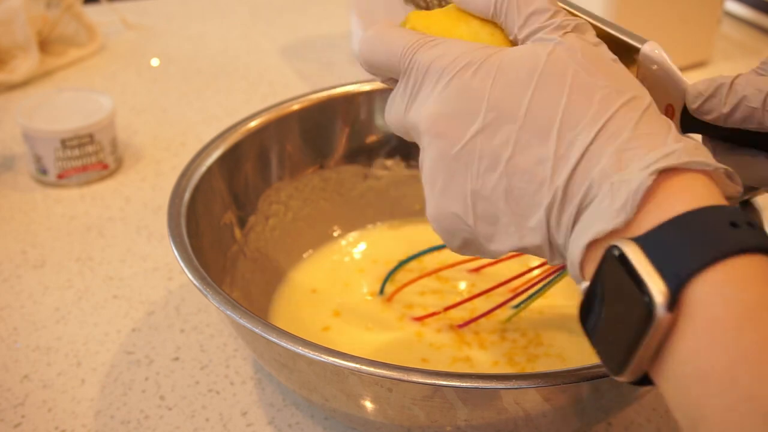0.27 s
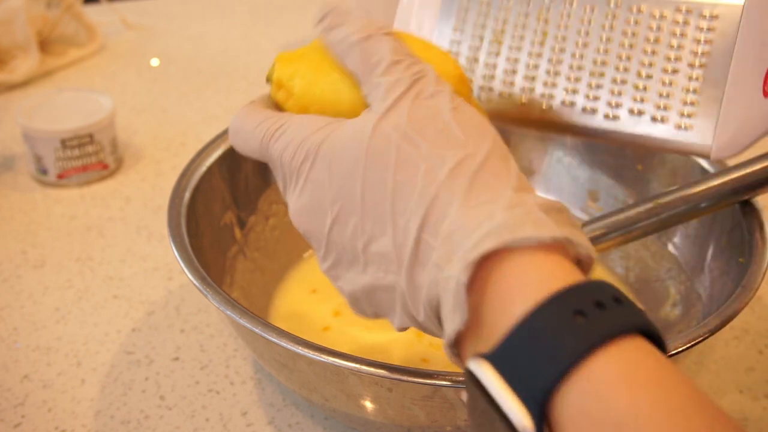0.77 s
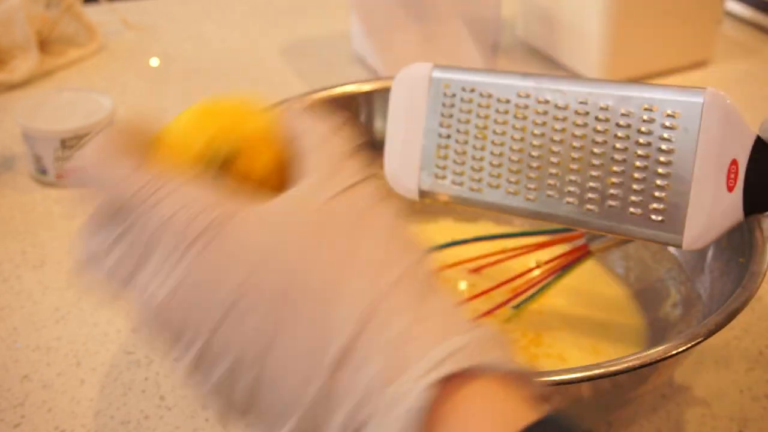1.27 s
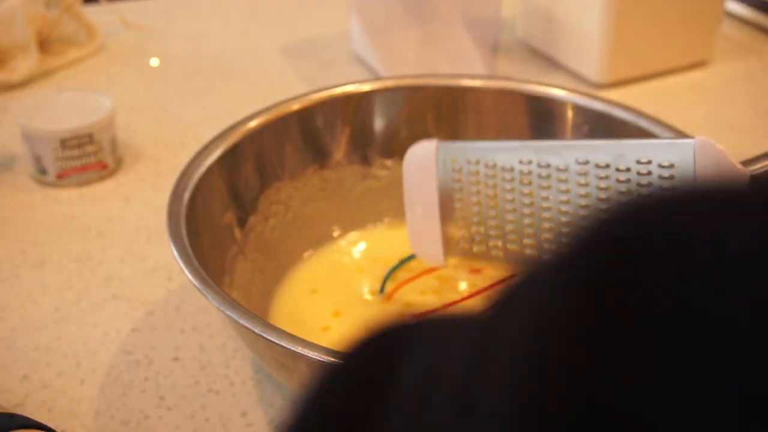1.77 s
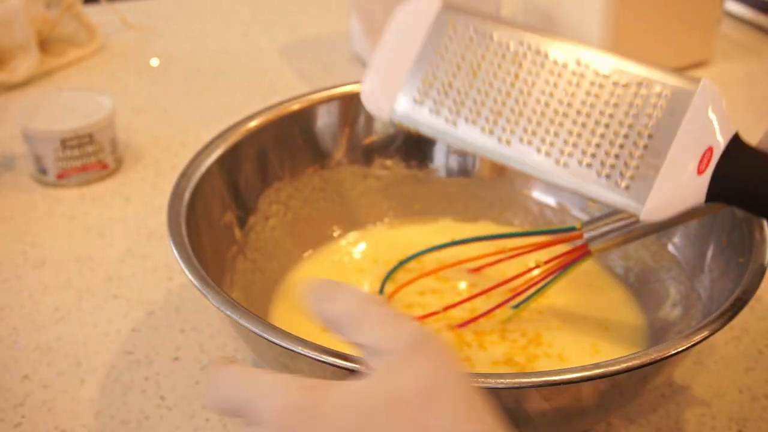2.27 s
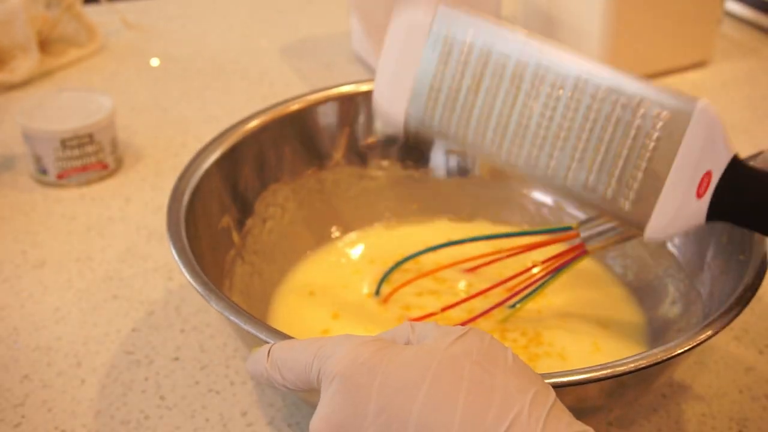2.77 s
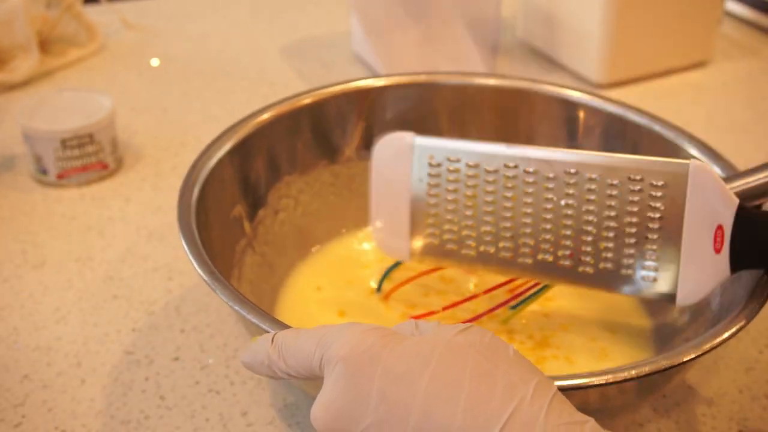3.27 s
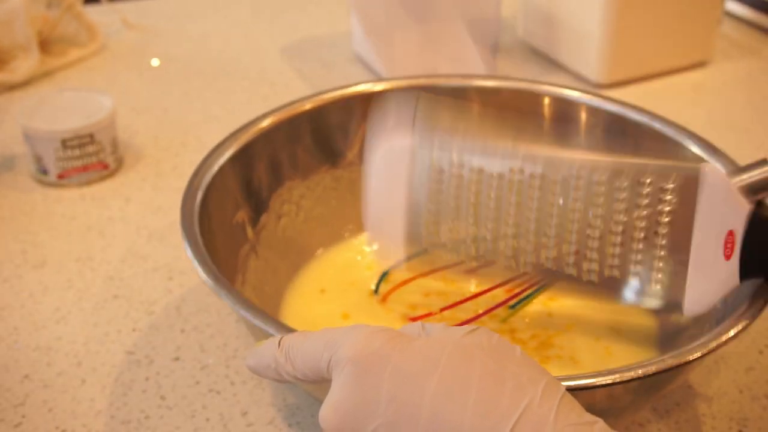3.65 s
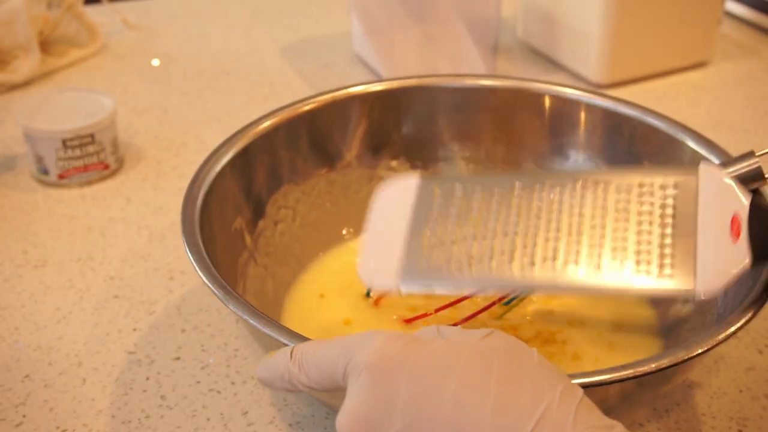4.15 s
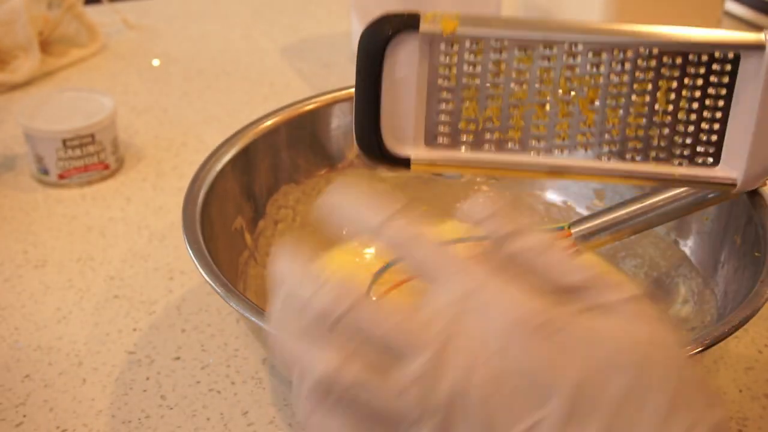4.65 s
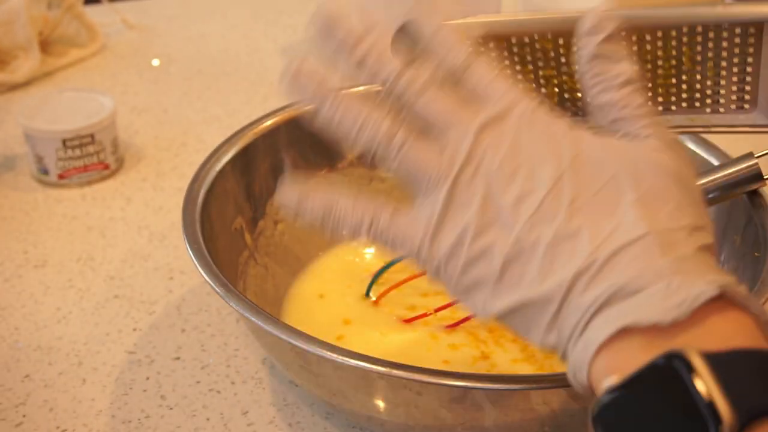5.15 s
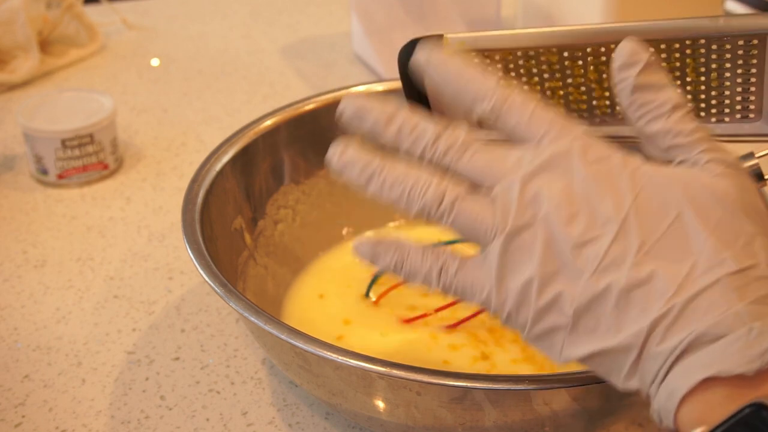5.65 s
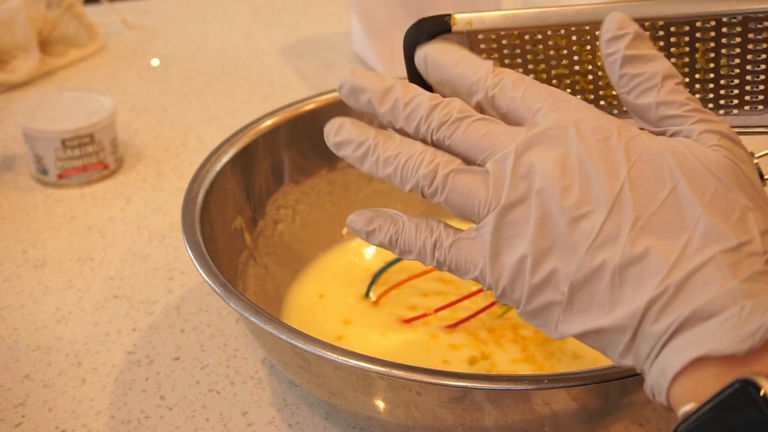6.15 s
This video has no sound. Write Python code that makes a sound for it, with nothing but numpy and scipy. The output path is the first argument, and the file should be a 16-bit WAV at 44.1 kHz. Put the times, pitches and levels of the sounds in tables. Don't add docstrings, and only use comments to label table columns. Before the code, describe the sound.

A hard, live kitchen, heard close in stereo, with steady low appliance hum, light hiss and barely audible high squeaks. From 0 to 0.5 s, four quick wet rasps tear lemon peel on a steel grater, broad and hissy, the plate singing at shifting pitches. From 0.6 to 2.4 s it is quiet: thin gloves crinkle, tiny ticks sound, and the bowl is nudged softly near 1.9. A lighter knock lands at 2.5, a firmer one at 2.7, then six hard blows about 0.2 s apart from 3.1 to 4.1. Each is a dull, hollow thud with bright whisk clanks and rebounds on the rim, rattling chatter and a low wobble as the base rocks. The ring dies away in the room. From 4.6, glove rustle and fine ticks return, with short dry finger brushes over the teeth around 5.2, 5.5, 5.9 and 6.4.

```python
import sys
import numpy as np
from scipy import signal
from scipy.fft import rfft, irfft
from scipy.io import wavfile

SR = 44100
rng = np.random.default_rng(int(sys.argv[2]) if len(sys.argv) > 2 else 0)


def store_pcm(level_fs):
    pcm = np.round(np.clip(level_fs, -1, 1) * 32767).astype(np.int16)
    wavfile.write(sys.argv[1], SR, np.atleast_2d(pcm).T)


def volts(x):
    e = np.asarray(x, float) / 20
    return 10 ** e


N = 283122

# (t/s, peak level/dB, pulse f/Hz, metal tick re peak/dB, whisk chatter/dB)
KNOCKS = [
    (2.529, -17, 487, -10, -41.5),
    (2.672, -14, 525, -14, -33.5),
    (3.087, -9.5, 570, -9.5, -37.5),
    (3.295, -8, 607, -7, -26.5),
    (3.502, -7, 540, -8, -35),
    (3.698, -7, 543, -9, -41.5),
    (3.889, -6.5, 595, -10.5, -39.5),
    (4.106, -6.5, 693, -12.5, -35.5),
]


def rms_one(x):
    return x / np.sqrt(np.mean(x ** 2) + 1e-20)


def at_hz(points, hz):
    table_hz, values = np.transpose(points)
    return np.interp(np.log(hz), np.log(table_hz), values)


def band(x, low_hz, high_hz):
    edges_hz = [low_hz, min(high_hz, 0.45 * SR)]
    return signal.sosfilt(signal.butter(2, edges_hz, "band", fs=SR, output="sos"), x + 1e-18)


def shaped(x, spectrum):
    hz = np.maximum(np.arange(N // 2 + 1) * SR / N, 1)
    return irfft(rfft(x) * volts(at_hz(spectrum, hz)), N)


def ring(clicks, hz, t60_s):
    r = volts(-60 / (t60_s * SR))
    w = 2 * np.pi * hz / SR
    return signal.lfilter([0, np.sin(w)], [1, -2 * r * np.cos(w), r * r], clicks + 1e-18)


def resonant(x, peaks):
    total = 0
    for hz, width_hz, db in peaks:
        t60_s = np.log(1000) / (np.pi * width_hz)
        total = total + volts(db) * rms_one(ring(x, hz, t60_s))
    return rms_one(total)


def grains(per_s, spread_db):
    sizes = volts(spread_db * np.minimum(rng.exponential(1, N), 4)) * rng.choice([-1, 1], N)
    return rms_one(sizes * (rng.random(N) < per_s / SR))


def dying(hits, t60_s):
    power = signal.lfilter([1], [1, -volts(-120 / (t60_s * SR))], hits ** 2 + 1e-18)
    return np.sqrt(power) * rng.standard_normal((2, N))


def swell(start_s, hold_s, db, rise_db_s, fall_db_s):
    t = np.arange(0, N + 32, 32) / SR
    climb_db = rise_db_s * np.maximum(start_s - t, 0)
    sink_db = fall_db_s * np.maximum(t - start_s - hold_s, 0)
    return np.interp(np.arange(N) / SR, t, volts(db - climb_db - sink_db))


def wide(pair):
    # (f/Hz, correlation)
    likeness = [(100, 0.94), (200, 0.88), (400, 0.68), (800, 0.12), (2000, 0.079), (5000, 0.057),
                (12000, 0.081)]
    size = pair.shape[1]
    hz = np.maximum(np.arange(size // 2 + 1) * SR / size, 1)
    alike = np.clip(at_hz(likeness, hz), 0, 1)
    mid, side = rfft(pair) * np.sqrt([1 + alike, 1 - alike])
    return irfft(np.array([mid + side, mid - side]), size) / np.sqrt(2)


def background():
    # (f/Hz, density/dB)
    hum_spectrum = [(15, -57), (25, -6.5), (70, -13), (114, -8.5), (200, -7), (223, -12), (309, -7.5),
                    (416, -12.5), (503, -15), (1650, -26), (1940, -27.5), (5430, -29), (16000, -33)]
    # (t/s, length/s, level/dB)
    squeaks = [
        (1.22, .09, -72),
        (1.82, .08, -72),
        (5.22, .04, -66),
        (5.75, .055, -73),
        (5.818, 0.032, -69),
        (6.25, 0.073, -68.5),
    ]
    hum = wide(shaped(rng.standard_normal((2, N)), hum_spectrum))
    t = np.arange(N) / SR
    whistle = rms_one(ring(rng.standard_normal(N), 11400, 0.06))
    gain = 0
    for start_s, length_s, db in squeaks:
        corners_s = [start_s, start_s + 0.015, start_s + length_s, start_s + length_s + 0.02]
        gain = gain + volts(db) * np.interp(t, corners_s, [0, 1, 1, 0])
    return volts(-53.5) * rms_one(hum) + gain * whistle


def rasp():
    # (full pressure t/s, hold/s, level/dB, plate tone re rasp/dB, singing spot f/Hz)
    rasp_strokes = [
        (-0.01, 0.02, -33, -9, 2180),
        (0.109, 0.045, -34, -5, 2800),
        (0.268, 0.024, -32.5, -6, 2140),
        (0.396, 0.08, -34, -6, 3460),
    ]
    # (f/Hz, density/dB)
    hiss_spectrum = [(350, -28), (600, -28), (1030, -13), (1490, -20), (2040, -8.5), (2800, -6.5),
                     (3040, -6), (4780, -10), (9360, -11), (11800, -7.5), (16000, -13)]
    # (f/Hz, width/Hz, level/dB)
    plate_modes = [(2330, 90, -4), (2450, 97, -5), (2700, 180, 8.5), (3450, 150, -3), (3500, 120, 3),
                   (4240, 140, 0), (6430, 200, -16)]
    teeth_modes = [(10500, 300, 5), (11500, 250, -7), (12700, 400, -3)]
    tearing = np.array([grains(per_s=9000, spread_db=2.5), 0.62 * grains(per_s=11000, spread_db=-1.5)])
    hiss = volts(3.0) * rms_one(wide(shaped(tearing, hiss_spectrum)))
    catching = grains(per_s=2500, spread_db=3.0)
    plate = volts(-3.5) * resonant(catching, plate_modes)
    teeth = volts(-15.0) * resonant(catching, teeth_modes)
    out = np.zeros((2, N))
    for start_s, hold_s, db, plate_db, spot_hz in rasp_strokes:
        spot = volts(-11.5) * resonant(catching, [(spot_hz, 120, 0)])
        pressure = swell(start_s, hold_s, db, rise_db_s=294, fall_db_s=484)
        out += pressure * (hiss + teeth + volts(plate_db) * plate + spot)
    return out


def gloves():
    # (t/s, hold/s, rustle level/dB, brightness/dB, hollow tone/dB)
    moves = [(0.56, 0.14, -63.5, -1, 10), (0.83, 0.013, -62.5, 0, -12), (0.94, .025, -64.5, 1, -5),
             (1.24, 0.073, -71, -4, -4), (1.37, 0.041, -60, -1, -6), (1.5, 0.25, -60.5, -5, 1.5),
             (2.0, 0.22, -61, 2.5, -7), (2.285, 0.014, -57, 4, -18), (2.441, 0.15, -54.5, -10, -8),
             (4.6, 0.07, -51.5, -2, -36), (4.74, .1, -60, 0, -5), (4.89, 0.1, -68, 3, -5),
             (5.14, .065, -69.5, 10, -20), (5.5, .02, -71, -3, -12), (5.885, .03, -67, 4, -20),
             (5.97, 0.046, -66, -6, -18), (6.2, 0.091, -77, 9, -10), (6.38, .04, -73, 6, -6)]
    # (t/s, length/s, level/dB, brightness/dB)
    brushes = [
        (1.359, 0.088, -59.5, 3),
        (5.111, 0.12, -70.5, 20),
        (5.186, .03, -54.5, 0),
        (5.491, 0.024, -51, -2.5),
        (5.873, 0.04, -49, 5),
        (6.364, 0.029, -56.5, -5),
    ]
    # (t/s, peak level/dB, f/Hz, fade/s)
    small_ticks = [(0.8205, -44, 9680, 0.0015), (0.9632, -44, 4340, 0.0015), (1.3894, -50, 2700, 0.0014),
                   (1.505, -55, 2230, 0.0015), (1.6305, -63, 2170, 0.0015), (1.767, -40.5, 5100, 0.0017),
                   (1.8907, -44, 8890, 0.0015), (2.0467, -42, 10500, 0.0015),
                   (2.0944, -46.5, 10300, 0.0015), (4.572, -36, 8600, 0.0015), (4.598, -42, 8360, 0.0019),
                   (4.6344, -41, 8100, 0.0015), (4.6775, -37, 5160, 0.0015), (4.7144, -45, 2420, 0.0016),
                   (4.8185, -35, 10700, 0.0017), (4.897, -40, 9500, 0.0013), (4.92, -44, 4360, 0.0013),
                   (5.004, -45, 4440, 0.0011), (5.21, -41, 4220, 0.0021), (5.417, -47, 4140, 0.0016),
                   (5.4955, -49, 4220, 0.0015), (5.6986, -41.5, 4000, 0.0014), (5.882, -35, 4160, 0.0026),
                   (5.9082, -32, 4690, 0.0024), (6.3657, -40.5, 4170, 0.0018)]
    t = np.arange(N) / SR
    crinkle = np.array([grains(per_s=2500, spread_db=1.0), grains(per_s=2300, spread_db=10.0)])
    dull = rms_one(band(crinkle, 2300, 8000))
    bright = rms_one(band(crinkle, 6500, 14000))
    hollow = rms_one(band(crinkle[:, ::-1], 2100, 2500))
    flutter = volts(2.0 * rms_one(band(rng.standard_normal(N), 12.4, 41)))
    gains = np.array([swell(start_s, hold_s, db, rise_db_s=200, fall_db_s=182)
                      for start_s, hold_s, db, _, _ in moves]) * flutter
    bright_db, hollow_db = np.transpose(moves)[-2:]
    out = gains.sum(0) * dull
    out += volts(bright_db) @ gains * bright
    out += volts(hollow_db - 5.5) @ gains * hollow

    frame = dull + volts(-23.0) * rms_one(band(crinkle, 4060, 4600))
    for start_s, length_s, db, brush_bright_db in brushes:
        end_s = start_s + length_s
        sweep = np.interp(t, [start_s, start_s + 0.0026, end_s, end_s + 0.022], [0.054, 1, 0.63, 0])
        out += sweep * volts(db) * (frame + volts(brush_bright_db) * bright)

    taps = np.zeros(N)
    for start_s, db, hz, fade_s in small_ticks:
        burst = rng.standard_normal(1500) * np.exp(-np.arange(1500) / (max(fade_s, 0.0003) * SR))
        click = band(burst, hz / 1.23, hz * 1.29) + volts(8.0) * band(burst, hz / 0.98, hz * 1.03)
        at = round(start_s * SR)
        taps[at:at + 1500] += volts(db) * click / np.abs(click).max()
    return wide(out), taps


def rocking():
    # (t/s, hold/s, level/dB, f/Hz, sway period/s)
    rocks = [
        (1.908, 0.061, -45, 94, 0.058),
        (2.515, .06, -46, 76, 0.07),
        (2.68, 0.12, -41.5, 73.8, .08),
        (3.092, 0.12, -35.5, 68.6, .077),
        (3.305, 0.071, -31, 69.3, 0.073),
        (3.51, 0.1, -32.5, 71, 0.073),
        (3.71, 0.078, -31, 69.7, 0.061),
        (3.91, 0.084, -29.5, 71, .085),
        (4.125, 0.066, -31, 70, 0.092),
    ]
    wobble = rms_one(band(rng.standard_normal(N), 12.0, 16.3))
    rumble = rms_one(band(rng.standard_normal(N), 85, 165))
    out = np.zeros(N)
    for k, (start_s, hold_s, db, hz, sway_s) in enumerate(rocks):
        since_s = np.clip(np.arange(N) / SR - start_s, -0.1, 0.6)
        fall_db_s = 130 if k else 900
        level = swell(start_s, hold_s, db, 1497, fall_db_s)
        level = level * (1 + 0.4 * np.cos(2 * np.pi * since_s / sway_s))
        pitch_hz = (hz - 25.12 * since_s) * (1 + 0.066 * wobble)
        tone = np.sin(2 * np.pi * np.cumsum(pitch_hz) / SR)
        out += level * (1.54 * tone + 0.48 * rumble)
    return out


def steel(ticks):
    # (t/s, peak level/dB, share below 2.6 kHz/dB, share above 5 kHz/dB)
    clanks = [(2.4417, -47, -20, -22.5), (2.481, -35, -19.5, -25.5), (2.5405, -9.5, -7.5, -26),
              (2.6847, -9.5, -6, -24.5), (2.8834, -34.5, -6.5, -28), (3.1114, -5.5, -11.5, -28),
              (3.1699, -13, -4, -21), (3.3184, -6, -11.5, -27), (3.3848, -7.5, -10.5, -26),
              (3.3972, -32, -13, -24), (3.5191, -8, -8.5, -24), (3.5892, -8.5, -11, -26),
              (3.717, -6.5, -10, -26.5), (3.7858, -12, -7, -22), (3.9102, -8, -7.5, -26),
              (3.9853, -19.5, -5.5, -19.5), (4.1205, -12, -6.5, -24), (4.1934, -23, -5, -19)]
    # (f/Hz, level/dB, t60/s)
    steel_modes = [(962.6, -23, 0.2), (1124, -33, 0.25), (1383, -18.5, 0.164), (1540, -4.5, 0.053),
                   (1760, -24, 0.1), (1955, -20, 0.11), (2003, -10.5, 0.15), (2120, -9.5, 0.16),
                   (2271, -11, 0.31), (2320, -18, 0.129), (2610, -3.5, 0.098), (2700, -22, 0.69),
                   (2792, -8, 0.13), (3050, -17, 0.033), (3310, 5.5, 0.041), (3240, -16.5, 0.17),
                   (3310, -11.5, 0.28), (3160, -26, 0.13), (3870, -25.5, 0.35), (4100, -15, 0.16),
                   (4340, -21, 0.065), (4690, -22, 0.099), (5160, -25, 0.087), (6050, -40, .2),
                   (6034, -20, 0.057), (6830, -32, .2), (6780, -33, 0.14), (4730, -15.5, 0.058)]
    # (f/Hz, density/dB)
    clatter_spectrum = [(500, -43), (800, -12), (1010, 2.5), (1300, -5), (1550, -8.5), (2220, -0.5),
                        (2730, 1), (3400, -7.5), (4200, -10), (4600, -15.5), (6100, -12.5), (6900, -17),
                        (7300, -31), (16000, -27)]
    start_s, peak_db, low_db, high_db = np.transpose(clanks)
    at = np.round((start_s + 0.0003) * SR).astype(int)
    luck_db = 1.5 * rng.normal(0, 1, (len(at), len(steel_modes)))
    shaking = np.zeros(N)
    for knock_s, _, _, _, chatter_db in KNOCKS:
        shaking += swell(knock_s + 0.052, 0.0203, chatter_db, rise_db_s=300.5, fall_db_s=102)
    chatter = grains(per_s=1830, spread_db=11.0) * shaking * volts(-26.5)

    clear = np.zeros(N)
    skid = (rng.random(luck_db.shape) * 0.003078 * SR).astype(int)
    for k, (hz, db, t60_s) in enumerate(steel_modes):
        share_db = np.where(hz < 2600, low_db + 10.5, np.where(hz > 5000, high_db + 32, 0))
        strength = volts(peak_db + share_db + luck_db[:, k])
        clicks = chatter + volts(1.0) * ticks
        clicks[at] += strength * (-1) ** k
        clicks[at + skid[:, k]] += 0.42 * strength
        clear += volts(db - 11.5) * ring(clicks, hz, 0.62 * t60_s)

    cracks, clangs, snaps = volts(-5.5) * ticks, volts(-15.0) * ticks, np.zeros(N)
    cracks[at] += volts(peak_db + high_db + 6.5)
    clangs[at] += volts(peak_db + low_db - 4.5)
    snaps[at] = volts(peak_db + low_db + 10.5)
    clear += band(dying(snaps, 0.024)[0], 1480, 2710)
    dense = dying(clangs, 0.17) + shaking * rng.standard_normal((2, N))
    clatter = shaped(dense, clatter_spectrum) * volts([[7], [1.5]])
    return clear, wide(band(dying(cracks, 0.031), 2500, 13000) + clatter)


def dip(hz):
    length = 1.6 * SR / hz
    cycle = np.arange(int(length)) / length
    return -np.cos(2 * np.pi * 1.57 * (cycle - 0.5)) * np.sin(np.pi * cycle) ** 1.66


def thuds():
    # (f/Hz, level/dB, t60/s)
    body_modes = [(122, -6, 0.14), (279.4, -4, 0.063), (355, -22, 0.37), (514.6, 2, 0.025),
                  (658, -7, 0.082), (754, -7.5, 0.05), (957, -19, 0.058)]
    out, ticks, blows = np.zeros(N), np.zeros(N), np.zeros(N)
    luck = rng.normal(0, 1, (len(KNOCKS), len(body_modes)))
    for (start_s, db, hz, tick_db, _), chances in zip(KNOCKS, luck):
        at = round((start_s + 0.000817) * SR)
        blow = np.zeros(SR // 3)
        pulses = [(0, dip(hz), 0), (0.0075, dip(0.75 * hz), -11.5), (0.0152, -dip(0.48 * hz), -11.5)]
        for late_s, pulse, gain_db in pulses:
            blow[int(late_s * SR):][:len(pulse)] += volts(db + gain_db) * pulse
        ticks[at + 70] = volts(db + tick_db)
        blows[at + 90] = volts(db)
        body = np.zeros(len(blow))
        for (mode_hz, mode_db, t60_s), chance in zip(body_modes, chances):
            strength = volts(mode_db - 40.5 + 5.3 * chance)
            body += strength * ring(blow, mode_hz * (1 + 0.01025 * chance), t60_s)
        out[at:at + len(blow)] += blow - body
    punch = band(dying(blows, 0.051)[0], 139, 590)
    boom = band(dying(blows, 0.69)[0], 150, 886)
    return out + punch + volts(-8.0) * boom, ticks


def ports(x):
    late = np.roll(band(x, 5700, 19000), round(0.0011 * SR))
    return x + volts(3.0) * late * [[1], [-1]]


def kitchen(x):
    # (f/Hz, t60/s, level/dB)
    room_bands = [(124, 0.81, -7), (292, 0.83, -2), (650, 0.78, -5), (1576, 0.61, 2.5), (2960, 0.49, -3),
                  (6540, 0.65, 0), (12000, 0.28, -5.5)]
    t = np.arange(SR) / SR
    white = rng.standard_normal((2, 2, SR))
    tail = 0
    for k, (hz, t60_s, db) in enumerate(room_bands):
        decay = volts(-60 * t / t60_s) * np.clip((t - 0.003) / 0.018, 0, 1)
        noise = band(white[k % 2], hz / 1.724, hz * 1.265)
        tail = tail + volts(db) * noise * decay / np.sqrt(np.sum(decay ** 2))
    return signal.fftconvolve(x[None], wide(tail * volts([[0], [-3.0]])), axes=1)[:, :N]


def scene():
    strokes = rasp()
    rustle, taps = gloves()
    thud, ticks = thuds()
    metal, clatter = steel(ticks)
    near = thud * volts([[-0.6], [0.6]]) + ports(metal + taps) + strokes + clatter + rocking()
    to_room = volts(-1.5) * thud + volts(-0.5) * (metal + clatter[0])
    to_room += volts(-6.0) * strokes[0] + volts(-4.5) * taps
    return near + kitchen(to_room) + rustle + background()


def top_cut(x):
    return signal.sosfilt(signal.butter(12, 17010, fs=SR, output="sos"), x)


def record(dry):
    rounded = 0.85 * np.tanh(dry / 0.9)
    low_pass = signal.cheby2(10, 60, 16900, fs=SR, output="sos")
    return top_cut(signal.sosfilt(low_pass, rounded))


dry = scene()
out = record(dry)
store_pcm(out)
```